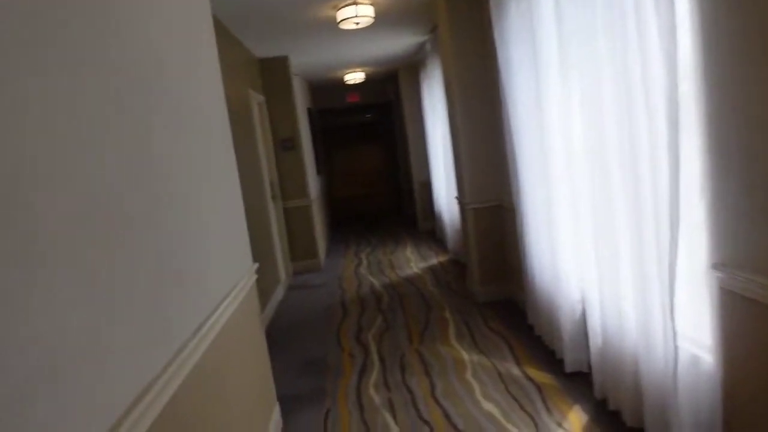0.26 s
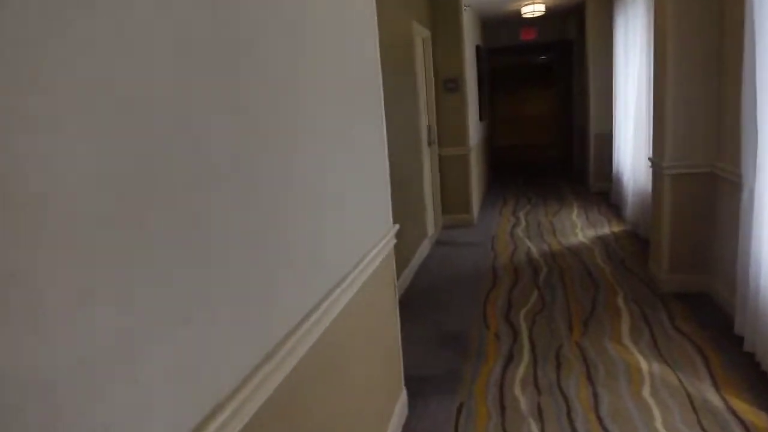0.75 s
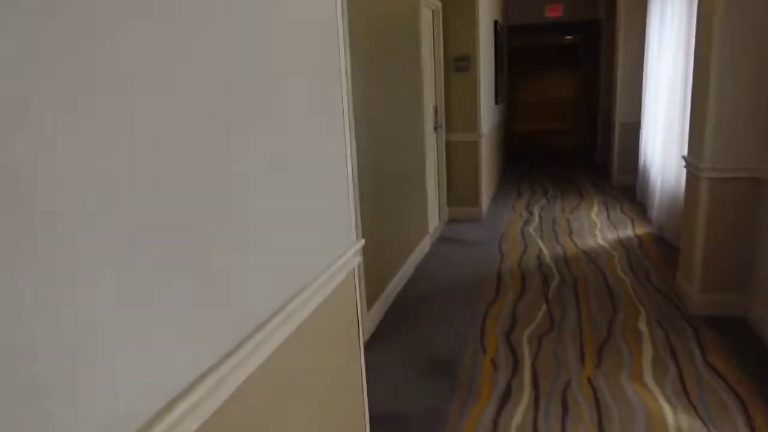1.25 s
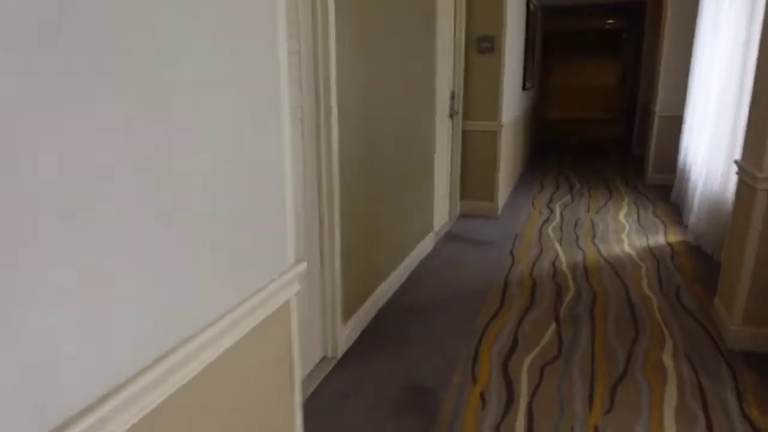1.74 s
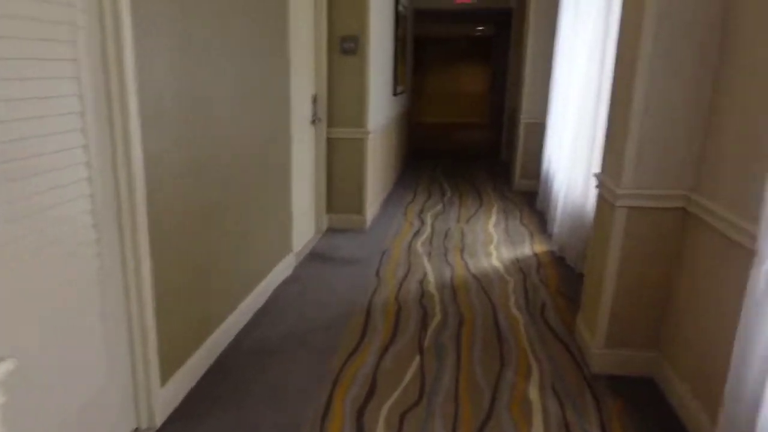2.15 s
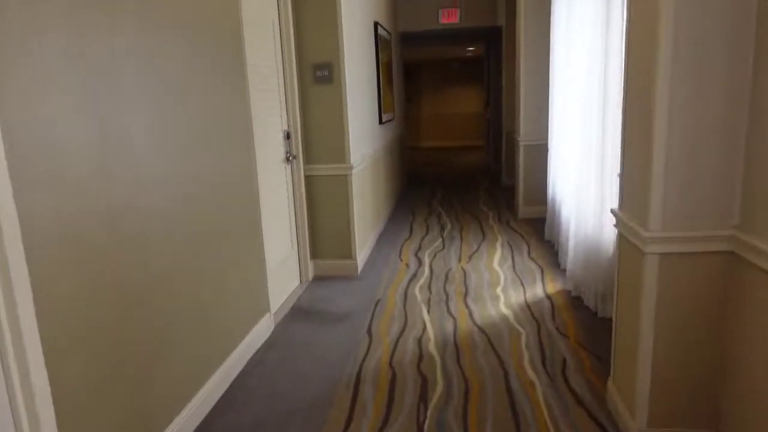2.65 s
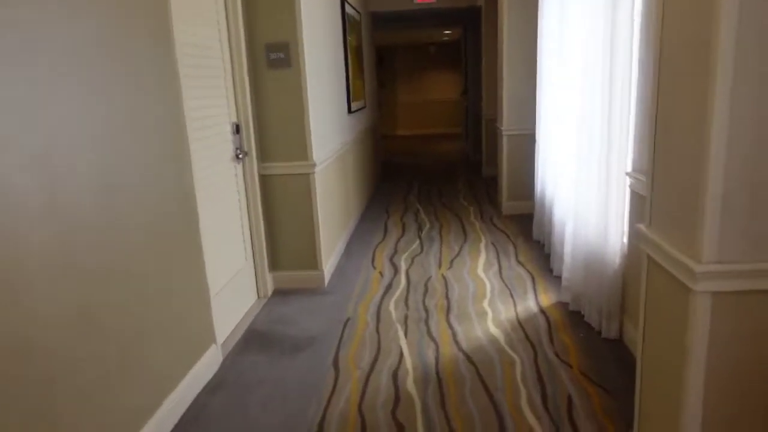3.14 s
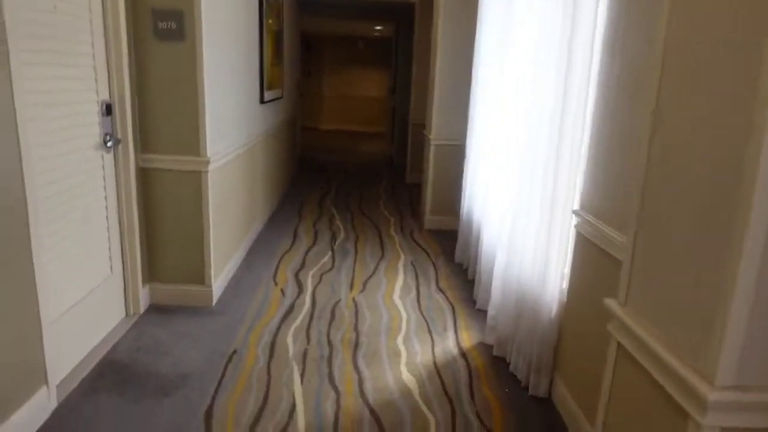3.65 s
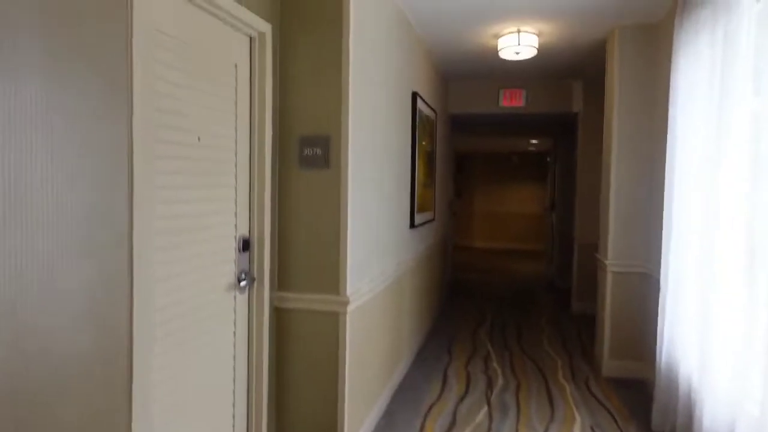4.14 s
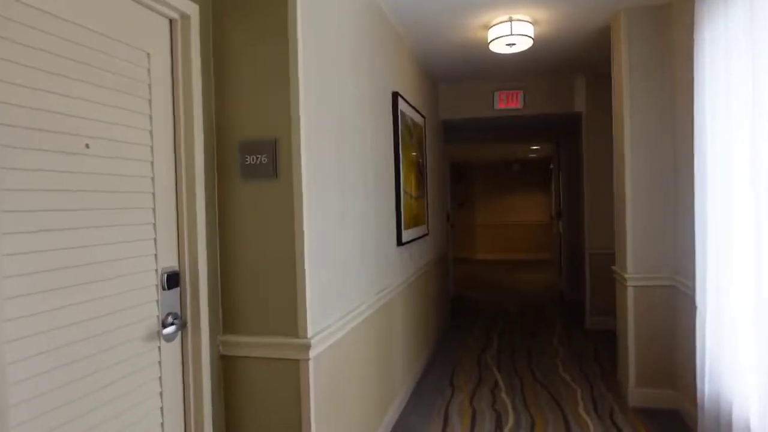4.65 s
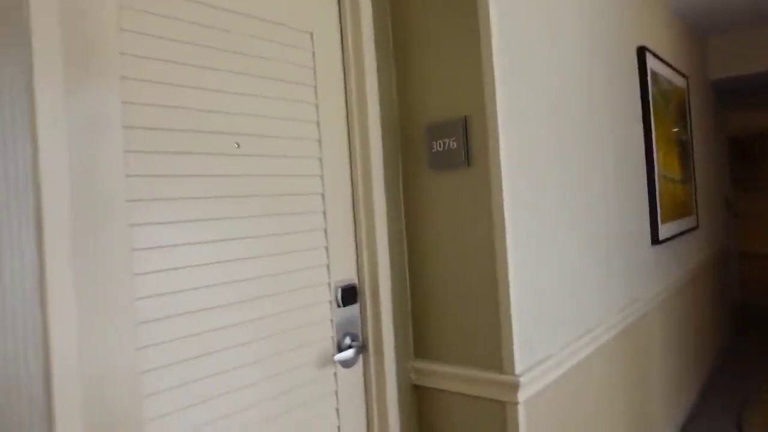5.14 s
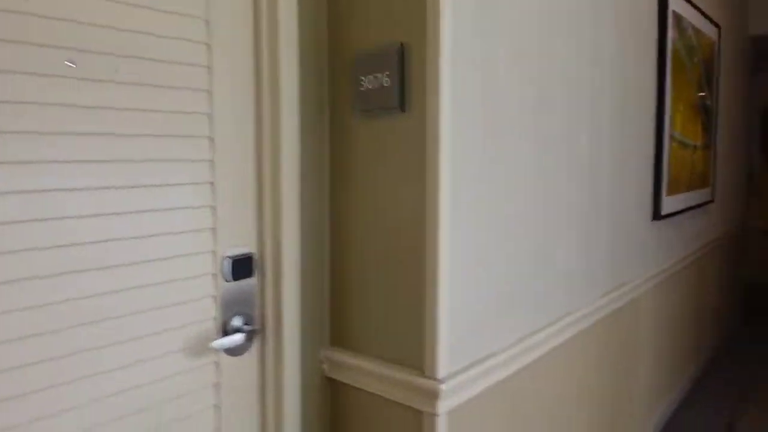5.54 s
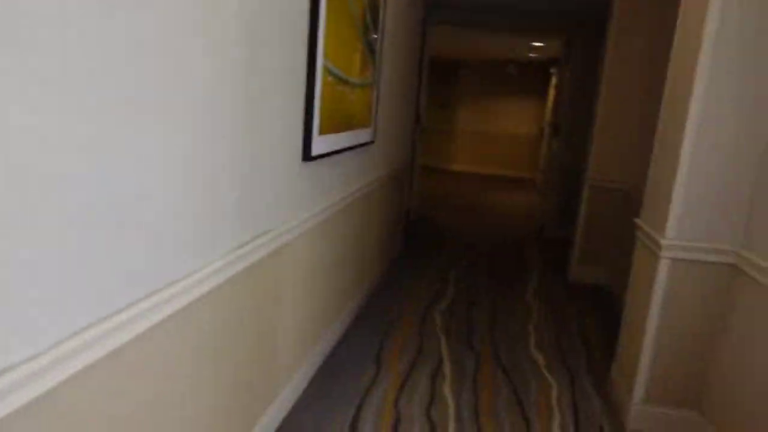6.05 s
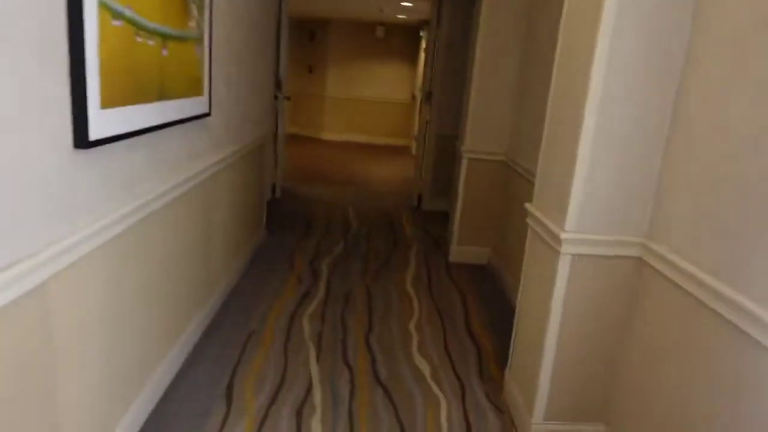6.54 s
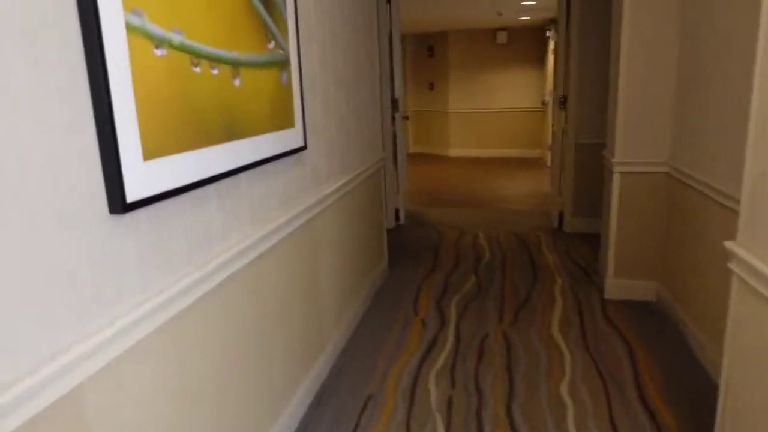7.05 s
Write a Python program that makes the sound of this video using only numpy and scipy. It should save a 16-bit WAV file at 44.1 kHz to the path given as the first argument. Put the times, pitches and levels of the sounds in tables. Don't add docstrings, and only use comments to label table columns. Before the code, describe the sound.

Someone walks along a reverberant carpeted hallway, flip-flop soles clacking sharply at the heels, with faint cloth rustle and light hiss between steps.

```python
import sys
import numpy as np
from scipy import signal
from scipy.fft import rfft, irfft, next_fast_len
from scipy.io import wavfile
from scipy.ndimage import uniform_filter1d, map_coordinates

SR = 44100
rng = np.random.default_rng(int(sys.argv[2]) if len(sys.argv) > 2 else 0)


def natural_amplitude(level_db):
    exponent = np.asarray(level_db, float) / 20
    return 10 ** exponent


def generate_wav(signal):
    frames = np.transpose(np.atleast_2d(signal))
    scaled = np.clip(frames, -1, 1) * 32767
    pcm = np.round(scaled).astype(np.int16)
    wavfile.write(sys.argv[1], SR, pcm)


N = 321474


def unit(x):
    return x / np.sqrt(np.mean(x ** 2) + 1e-20)


def along(points, hz):
    f, value = np.transpose(points)
    return np.interp(np.log(hz + 1), np.log(f + 1), value)


def hump(hz, centre_hz, width_hz):
    return np.abs(hz * width_hz / (centre_hz ** 2 - hz ** 2 + 1j * hz * width_hz))


def wobble(rate, size):
    knots = rng.standard_normal(int(size * rate / SR) + 4)
    return map_coordinates(knots, [np.arange(size) * rate / SR])


def filtered(x, response):
    m = next_fast_len(N + 8192)
    return irfft(rfft(x, m) * response(np.fft.rfftfreq(m, 1 / SR)), m)[:N]


def smoothed_grid(shape, bins, frames):
    field = uniform_filter1d(rng.standard_normal(shape), bins, 0)
    return unit(uniform_filter1d(field, frames, 1))


def rush(spectrum, patchy_db):
    z = signal.stft(rng.standard_normal(N), nperseg=512)[2]
    patches = natural_amplitude(patchy_db * smoothed_grid(z.shape, 6, 10))
    noise = signal.istft(z * patches, nperseg=512)[1][:N]
    return unit(filtered(noise, lambda hz: natural_amplitude(along(spectrum, hz))))


# (t/s, length/s, fizz level/dB, cloth over fizz/dB, dull over fizz/dB)
SCUFF_STROKES = [(0.191, .07, -56.5, -4, -1.5), (0.27, 0.068, -56.5, 2.5, -6),
                 (1.015, 0.16, -59.5, 2.5, -3), (2.402, 0.034, -53, -0.5, -18), (2.445, 0.063, -54, 3, -1),
                 (2.933, 0.1, -55.5, -0.5, -10), (4.64, .11, -52, 2.5, -4), (5.142, 0.12, -51, -4, -7),
                 (5.512, 0.096, -60, 5, 2), (5.758, 0.096, -51, 1.5, -10), (6.099, 0.078, -53, -2.5, -2),
                 (6.648, 0.13, -61.5, 5.5, 4.5), (7.212, .05, -55, 3, 5.5)]
# (t/s, length/s, fizz level/dB, cloth over fizz/dB, dull over fizz/dB)
CLOTH_STROKES = [(0.0, 0.047, -64.5, -1, 8.5), (0.41, .15, -58.5, -0.5, 4), (0.62, 0.053, -63.5, -1, 4),
                 (1.35, 0.047, -62.5, 5, -6), (1.86, 0.092, -54, -5.5, -8), (2.79, .16, -60.5, 1, -0.5),
                 (2.37, .04, -60, 0, -5), (5.45, 0.075, -60.5, 1, -2), (6.29, .03, -51.5, 2, -5),
                 (6.9, 0.044, -56.5, 6, -1), (3.26, 0.14, -58.5, 1.5, -1), (3.73, 0.081, -55.5, -5.5, -14),
                 (3.84, .1, -59, 2, -1), (4.11, 0.12, -59, -6, -6), (4.77, 0.088, -55, -3, -3),
                 (5.28, 0.07, -57.5, 0.5, 0), (5.62, .13, -58.5, -1, -6), (5.99, .1, -60, 0, -3),
                 (6.19, 0.19, -56.5, -0.5, -3), (6.96, 0.088, -59.5, 3.5, -10), (7.06, 0.14, -52.5, -3, -5)]
# level/dB of the low, body, cloth and fizz bands
SWAY_LEVELS = (-73.5, -68, -70, -66)
# (f/Hz, level/dB)
LOW_SPECTRUM = [(30, -27), (120, -17), (250, -3), (400, -2), (700, -4), (1000, -17.5)]
BODY_SPECTRUM = [(600, -38), (900, -2.5), (1300, 2), (1800, -0.5), (2400, -33)]
CLOTH_SPECTRUM = [(1500, -22), (2000, 3), (2700, 0.5), (3200, -3), (3800, -3), (4800, -18)]
FIZZ_SPECTRUM = [(3200, -9), (4500, -0.5), (6000, 0), (8000, -5), (11000, -9), (15000, -13)]


def brushing():
    scuff_rise_s, rustle_rise_s, fade_s = 0.008, 0.027, 0.049
    sag_db_per_s = 9.5
    low_under_dull_db = -9
    t = np.arange(N) / SR
    power = natural_amplitude(2 * np.array(SWAY_LEVELS))[:, None] * np.ones(N)
    strokes = [(scuff_rise_s, *row) for row in SCUFF_STROKES]
    strokes += [(rustle_rise_s, *row) for row in CLOTH_STROKES]
    for rise_s, start_s, length_s, fizz_db, cloth_db, dull_db in strokes:
        since = t - start_s
        shape = np.clip(since / rise_s, 0, 1)
        shape = shape * np.exp(-np.clip(since - length_s, 0, None) / fade_s)
        shape = shape * natural_amplitude(-sag_db_per_s * np.clip(since, 0, length_s))
        band_db = fizz_db + np.array([dull_db + low_under_dull_db, dull_db, cloth_db, 0])
        power += (natural_amplitude(band_db)[:, None] * shape) ** 2
    low, body, cloth, fizz = np.sqrt(power) * natural_amplitude(-3.0)
    unevenness = natural_amplitude(0.7 * wobble(40, N))
    grit = unit(natural_amplitude(0.37 * wobble(600, N)))
    dull = low * rush(LOW_SPECTRUM, patchy_db=4.5) + body * rush(BODY_SPECTRUM, patchy_db=2.5)
    bright = cloth * rush(CLOTH_SPECTRUM, patchy_db=2.0) + fizz * rush(FIZZ_SPECTRUM, patchy_db=3.0)
    return unevenness * (dull + grit * bright)


# (f/Hz, level/dB per Hz)
HISS_SPECTRUM = [(59, -55), (100, -16), (222, -17.5), (367, -11.5), (688, -6.5), (1290, -6.5), (2860, -4.5),
                 (3460, -6), (5960, -8), (9260, -12.5), (14100, -15), (15000, -12.5)]


def hiss():
    return natural_amplitude(-57.5 - 2.5) * rush(HISS_SPECTRUM, patchy_db=2.65)


# (t/s, level/dB, f/Hz, half width/s)
JOLTS = [(.2, -52, 1100, .002), (.733, -66, 130, .01), (.705, -63, 90, .014), (.795, -69, 105, .01),
         (4.08, -70, 110, .015), (3.085, -55, 650, .035), (3.4385, -48, 750, .002), (.39, -58, 380, .03),
         (1.23, -68, 70, .008), (6.8, -68, 60, .008), (5.078, -50, 900, .002), (4.962, -46, 1300, .002),
         (4.452, -48, 1500, .002)]


def bumps():
    t = np.arange(N) / SR
    out = np.zeros(N)
    for s, db, hz, width_s in JOLTS:
        envelope = np.exp(-((t - s) / width_s) ** 2)
        out += natural_amplitude(db) * envelope * np.sin(2 * np.pi * hz * (t - s))
    return out


# (t/s, peak level/dB, f/Hz)
STRAY_TICKS = [(0.2007, -45, 2870), (0.2044, -43, 2000), (0.684, -43, 4960), (1.8919, -44, 2020),
               (2.4226, -35, 2470), (2.464, -46, 5770), (2.942, -39.5, 4100), (3.414, -42.5, 4530),
               (6.249, -46, 3180), (3.437, -43.5, 1500), (4.661, -35, 2820), (5.205, -41, 4000),
               (5.53, -41, 1700)]
# (t/s, peak level/dB, f/Hz)
LOUD_CRACKS = [(0.3222, -40, 4970), (0.324, -38, 2040), (0.338, -30, 6800), (0.7528, -29, 5600),
               (0.7943, -31, 6020), (1.2324, -28.5, 1980), (1.2348, -28, 4600), (1.6342, -31, 5350),
               (2.11, -26.5, 6030), (2.1135, -26, 13400), (2.5448, -31, 4900), (3.029, -25.5, 14400),
               (3.0442, -39, 5590), (3.4871, -24.5, 6000), (3.4923, -23, 9000), (3.4931, -28, 6110),
               (3.505, -30.5, 5940), (3.945, -29, 6500), (3.95, -29, 7230), (3.9516, -30, 5850),
               (4.3735, -27.5, 4990), (4.8784, -25, 4820), (4.881, -26, 6470), (5.3468, -31, 6250),
               (5.8184, -32, 5250), (5.822, -24.5, 5770), (5.8253, -27, 4840), (5.839, -27, 5420),
               (6.3204, -29, 4860), (6.8032, -27.5, 4990), (7.259, -28.5, 5160)]


def cracks():
    out, t = np.zeros(N + SR), np.arange(SR // 50) / SR
    contacts = rattle() + LOUD_CRACKS + STRAY_TICKS
    chance = rng.standard_normal((len(contacts), len(t)))
    for (s, db, hz), noise in zip(contacts, chance):
        ring = np.sin(2 * np.pi * hz * t) * natural_amplitude(-60 * t / (0.0038 + 12 / hz))
        click = 0.49 * min(hz / 5000, 1.2) * np.diff(noise, prepend=0) * natural_amplitude(-60 * t / 0.0077)
        knock_db = -7.5 - 0.22 * (db + 32.5) + 5 * noise[1]
        knock_hz = 1400 * np.exp(0.12 * noise[0])
        knock = natural_amplitude(min(knock_db, 4) - 8.5) * np.sin(2 * np.pi * knock_hz * t) * natural_amplitude(-60 * t / 0.022)
        onset = 1 - np.exp(-t / 0.000094)
        out[round(s * SR):][:len(t)] += natural_amplitude(db) * (ring + click + knock) * onset
    return out[:N]


# (t/s, level/dB, air pocket f/Hz, sole f/Hz, sole level/dB)
HEEL_SLAPS = [(0.335, -38.5, 1650, 6230, -12), (0.749, -32, 1260, 5700, -2),
              (1.229, -30.5, 1670, 6340, -4.5), (1.634, -35, 1360, 5570, -3),
              (2.108, -33.5, 1470, 4920, -1.5), (2.541, -32, 1430, 4400, -11),
              (3.023, -31, 1150, 5100, -1.5), (3.484, -29, 1290, 5900, -5.5),
              (3.942, -30.5, 1340, 4900, -5), (4.37, -31.5, 1430, 5300, -11), (4.874, -32, 1250, 6170, -13),
              (5.346, -37.5, 1500, 5000, 2), (5.818, -34.5, 1210, 5530, -0.5),
              (6.317, -30.5, 1550, 5040, -2), (6.798, -32.5, 1440, 4860, -0.5),
              (7.254, -28.5, 1300, 6160, -5.5)]
# (heel thud level/dB, thud f/Hz, strap level/dB, echo length factor, near wall level/dB)
FOOT_LANDINGS = [(-47, 420, 0, 1.04, -42), (-40.5, 820, -9, 0.88, -47), (-50, 730, -17, 1.04, -44),
                 (-42.5, 430, -20, 1.04, -41), (-39.5, 510, -17, 0.93, -41), (-38, 670, -12, 0.87, -34),
                 (-39.5, 580, -6.5, 0.86, -37), (-37.5, 440, -10, 1, -38), (-38.5, 400, -37, 0.99, -38),
                 (-43.5, 375, -30, 1.09, -45), (-38.5, 690, -2, 1.07, -33), (-52, 420, -13, 0.92, -34),
                 (-39, 450, -5.5, 0.99, -40), (-34, 1070, -18, 0.76, -41.5), (-37.5, 750, -3.5, 1.06, -42),
                 (-39, 730, -10, 1.1, -36.5)]
# (air pocket/Hz, strap/Hz, sole/Hz, edge/Hz)
MODE_WIDTHS = (547, 550, 680, 1050)
# (f/Hz, level/dB)
AIR_SPECTRUM = [(700, -13.5), (1100, -12), (2000, -9), (3500, -11.5), (5500, -10), (8000, -15),
                (11000, -16), (15000, -46)]
# (f/Hz, level/dB)
THUD_SPECTRUM = [(150, -31), (250, 4), (350, 1), (600, -29), (900, -6), (1500, -5)]
# (f/Hz, T60/s)
CORRIDOR_T60 = [(200, 0.62), (500, 0.8), (1400, 0.78), (3000, 0.54), (6000, 0.52), (10000, 0.42),
                (15000, 0.33)]
# (f/Hz, level/dB)
NEAR_WALLS = [(500, -45), (1400, -4.5), (5000, -6), (12000, 7)]


def slaps():
    strap_hz, edge_hz, edge_over_sole_db = 2510, 7220, -8
    lead_s, rise_s = 0.02, 0.003
    out, size = np.zeros(N + SR), 3 * SR // 4
    t = np.arange(size) / SR
    rise = 1 / (1 + np.exp(-(t - lead_s) / rise_s))
    for slap, landing in zip(HEEL_SLAPS, FOOT_LANDINGS):
        s, db, pocket_hz, sole_hz, sole_db = slap
        thud_db, thud_hz, strap_db, linger, near_db = landing
        sparse = natural_amplitude(1.8 * np.exp(-t / 0.11) * wobble(709, size))
        hz, frames, z = signal.stft(sparse * rng.standard_normal(size), SR, nperseg=256)
        hz = hz[:, None]

        centres_hz = (pocket_hz, strap_hz, sole_hz, edge_hz)
        levels_db = (0, strap_db, sole_db, sole_db + edge_over_sole_db)
        power = natural_amplitude(2 * along(AIR_SPECTRUM, hz))
        for centre_hz, width_hz, top_db in zip(centres_hz, MODE_WIDTHS, levels_db):
            power = power + natural_amplitude(2 * top_db) * hump(hz, centre_hz, width_hz) ** 4

        thud = natural_amplitude(along(THUD_SPECTRUM, hz) - 2.3 * np.log2(thud_hz / 430))
        thud = natural_amplitude(thud_db - db) * (thud + 0.9 * hump(hz, thud_hz, 214) ** 2)
        thud = thud * (1 - np.exp(-frames / 0.034))

        fill = 1 - 0.28 * np.exp(-frames / 0.066)
        fade = fill * natural_amplitude(-60 * frames / (linger * along(CORRIDOR_T60, hz)))
        fade = fade + natural_amplitude(near_db - db + 4.5 + along(NEAR_WALLS, hz) - 60 * frames / 0.13)
        ripple = natural_amplitude(np.clip(hz / 3000, 0, 1.5) * rng.standard_normal(hz.shape))
        lumps = natural_amplitude(0.92 * smoothed_grid(z.shape, 3, 7))
        z = z * lumps * ripple * np.sqrt(power + thud ** 2) * fade
        body = signal.istft(z, SR, nperseg=256)[1][:size]
        out[round((s + 0.003 - lead_s) * SR):][:size] += natural_amplitude(db + 6.0) * body * rise
    return filtered(out[:N], lambda hz: hz ** 4 / (hz ** 4 + 190 ** 4))


def rattle(count=5):
    gap_s, spread, loss_db = 0.0035, 1.4, 1.1
    k = np.arange(count)
    luck = rng.standard_normal((len(HEEL_SLAPS), 3, count))
    s, slap_db, _, sole_hz, _ = np.transpose(HEEL_SLAPS)[:, :, None]
    late_s = gap_s * k ** spread * np.exp(0.2 * luck[:, 0])
    db = -33.5 + 0.47 * (slap_db - slap_db.mean()) - loss_db * k + 0.84 * luck[:, 1]
    hz = sole_hz * np.exp(0.204 * luck[:, 2])
    return list(zip((s + late_s).ravel(), db.ravel(), hz.ravel()))


def scene():
    mono = brushing() + hiss() + bumps() + cracks() + slaps()
    return np.array([mono, mono])


def top_cut(x):
    return signal.sosfilt(signal.butter(12, 16420, fs=SR, output="sos"), x)


def record(dry):
    def response(hz):
        bass_ratio = (hz / 170) ** 4
        bass = np.sqrt(natural_amplitude(-20) + bass_ratio) / np.sqrt(1 + bass_ratio)
        return bass / (1 + (hz / 15040) ** 150)

    kept = filtered(dry[0], response)
    return top_cut(np.array([kept, kept]))


dry = scene()
out = record(dry)
generate_wav(out)
```